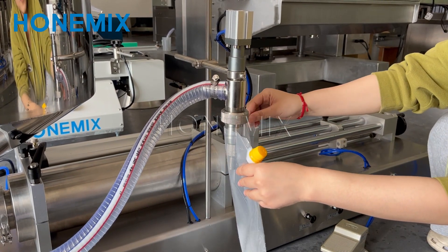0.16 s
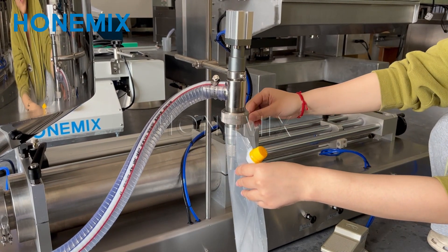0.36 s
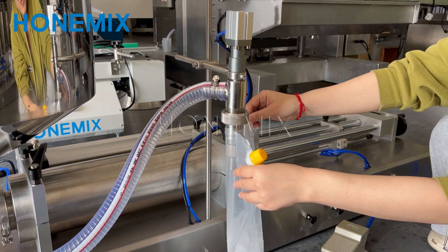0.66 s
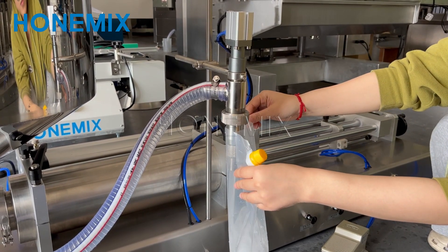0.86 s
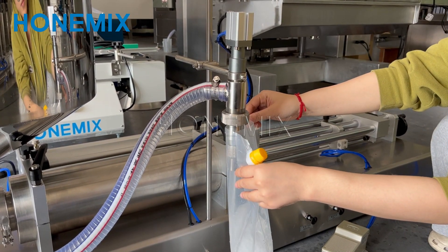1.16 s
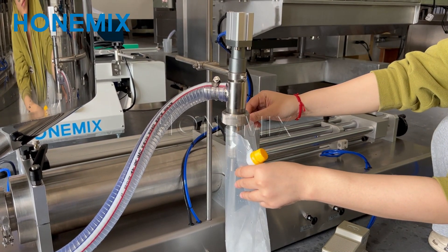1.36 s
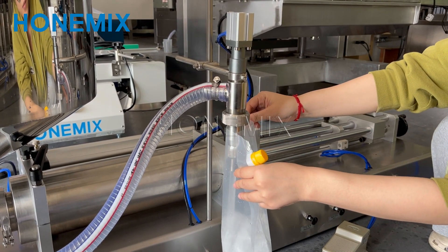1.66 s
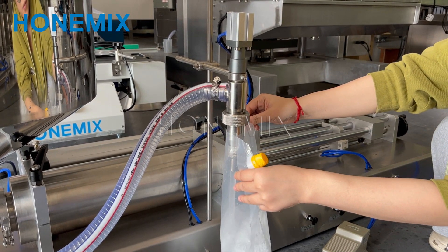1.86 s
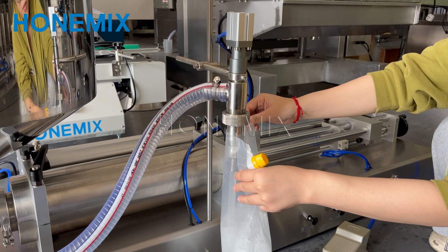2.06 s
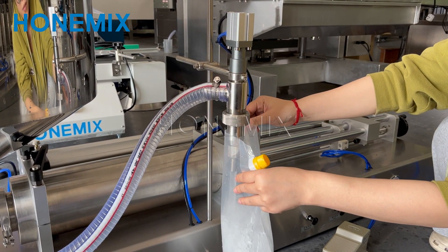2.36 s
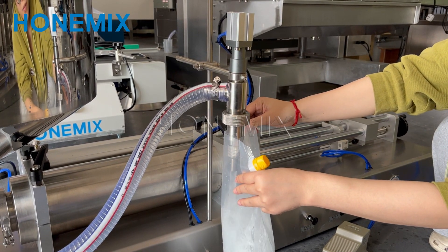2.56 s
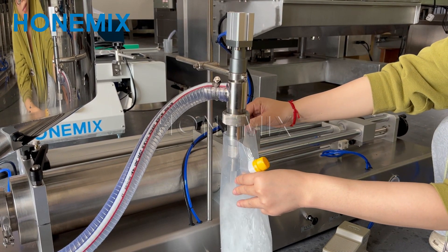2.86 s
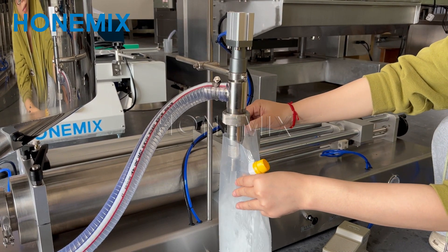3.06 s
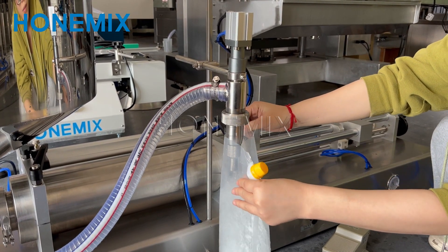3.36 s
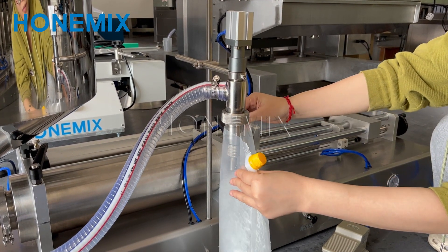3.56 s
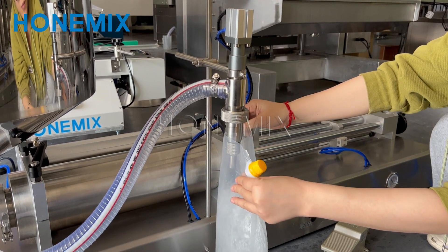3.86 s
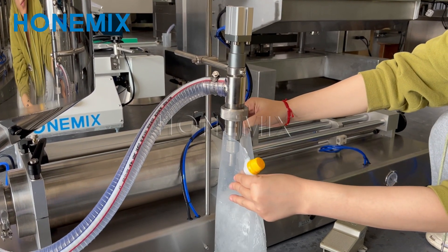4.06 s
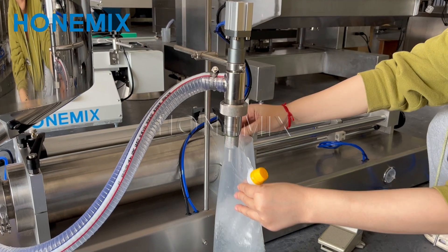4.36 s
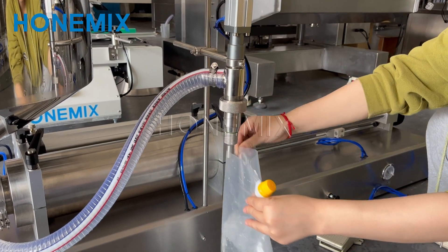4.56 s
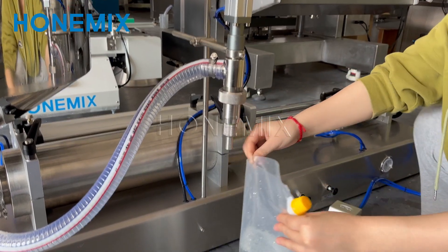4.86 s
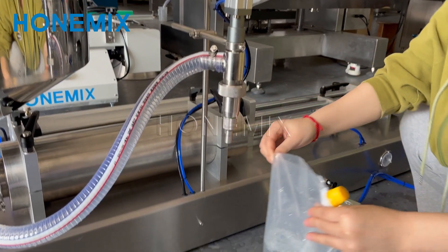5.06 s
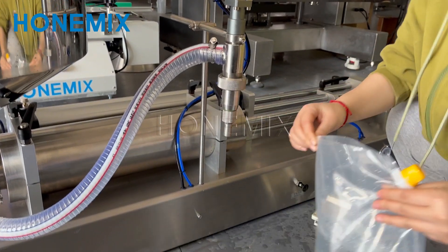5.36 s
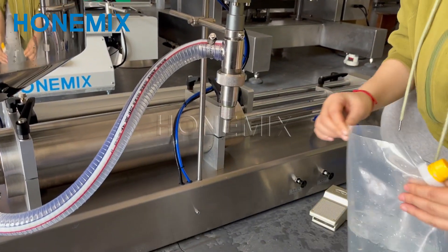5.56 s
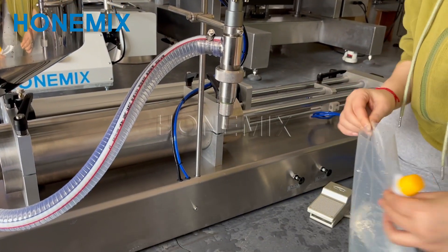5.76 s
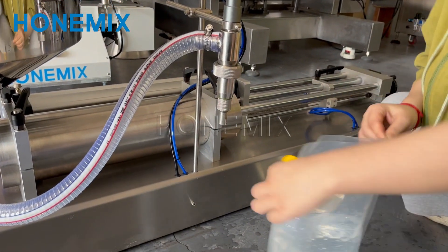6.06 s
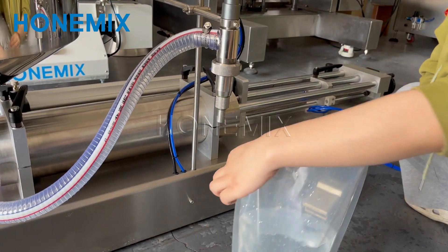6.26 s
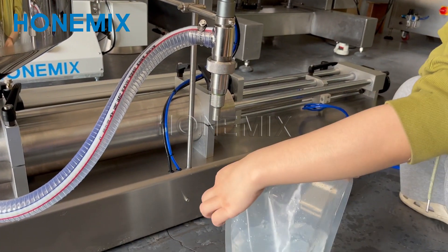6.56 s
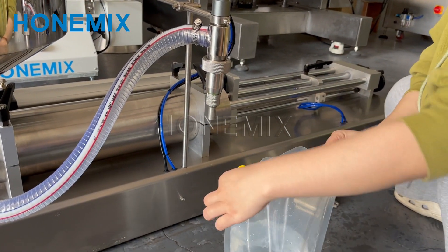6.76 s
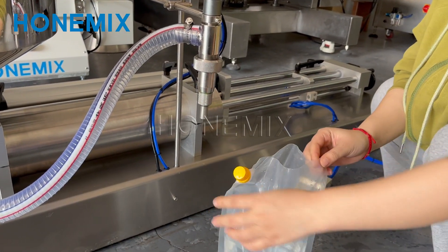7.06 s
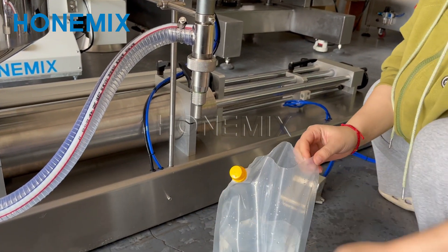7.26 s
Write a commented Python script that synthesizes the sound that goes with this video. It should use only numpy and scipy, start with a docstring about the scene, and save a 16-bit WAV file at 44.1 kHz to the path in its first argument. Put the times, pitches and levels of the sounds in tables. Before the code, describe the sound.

Liquid runs into a plastic pouch under a constant resonant hiss from throttled air. After about three seconds the valve bangs, rattles and vents a strong rush of air with a faint groan inside; it fades and a softer double knock follows. The rest is quiet: ventilation rumble, brief film snaps, thin seal whistle, one clear plastic tap and a weaker one, then more crackling. Near microphone, modest workshop reverberation.

```python
"""Air hisses steadily while liquid runs into a plastic pouch; a valve slams, an air blast follows and dies away, with a
second, lighter slam. Then the pouch crackles, a seal whistles faintly and a spout taps, all over a workshop hum.
Air jets are noise shaped by pipe resonances; slams, taps and snaps are struck modes; bubbles are decaying sines.
The hum is narrow noise bands. Two microphone ports with differing phase and level give the stereo image."""
import sys
import numpy as np
from scipy import signal
from scipy.fft import rfft, irfft
from scipy.io import wavfile

SR = 44100
rng = np.random.default_rng(int(sys.argv[2]) if len(sys.argv) > 2 else 0)


def waveform_to_disk(signal):
    """Save audio, clipped to [-1, 1], as 16-bit WAV at the path in sys.argv[1]."""
    frames = np.transpose(np.atleast_2d(signal))
    scaled = np.clip(frames, -1, 1) * 32767
    samples = np.round(scaled).astype(np.int16)
    wavfile.write(sys.argv[1], SR, samples)


N = 326472
TIME = np.arange(N) / SR  # s
FREQ = np.fft.rfftfreq(N, 1 / SR) + 1e-3  # Hz, offset to avoid division by zero

# Throttled exhaust spectrum. Each row: frequency in Hz, relative density in dB per Hz.
FILL_COLOUR = [(700, -0.5), (1200, 1.2), (1900, -0.9), (2900, 0), (3900, -0.5), (5100, 0), (6300, -1),
               (7500, -1.5), (9500, -4.5), (11200, -2.5), (13000, -6.5), (15000, -14)]
# Pipework resonances. Each row: frequency in Hz, height above the colour in dB before the contrast factor.
FILL_RINGS = [(1399, 3), (1600, 4), (1715, 11.5), (1830, 9.5), (1959, 9.5), (2024, 7.8), (2099, 10.1),
              (2260, 7.5), (2305, 7.5), (2465, 4.4), (2670, 7.7), (3057, 7.5), (3560, 4.5), (3645, 7.5),
              (3690, 9), (3811, 6.5), (3865, 8.4), (4134, 8.4), (4198, 11.5), (4295, 4), (4730, 5),
              (4812, 5.2), (4875, 5), (5017, 10.5), (5103, 7.4), (5178, 8.5), (5297, 8.0), (5740, 8),
              (5964, 5), (6158, 6), (6287, 5.3), (6406, 5), (6503, 5), (6739, 8.1), (7170, 7), (7400, 6),
              (11220, 5), (13210, 5), (13430, 6), (13990, 11), (14080, 9), (14400, 5)]
# Resonance groups that swell and fade. Each row: frequency in Hz, width in Hz, depth in dB.
FILL_SWELLS = [(1770, 200, 1.8), (2150, 300, 1.8), (4190, 150, .9)]
# Liquid churn spectrum. Each row: frequency in Hz, relative density in dB per Hz.
POUR_COLOUR = [(60, -4.5), (100, -2), (200, -6), (350, -5), (520, -9), (900, -17.5), (2000, -35)]
# Large bubbles. Each row: start in seconds, initial pitch in Hz, level in dB.
GULPS = [(1.598, 367, -29), (1.65, 377, -24.5), (1.68, 340, -28), (1.949, 318, -26), (2.715, 322, -25),
         (2.749, 340, -29), (2.785, 264, -26.5), (2.87, 324, -29), (2.987, 281, -28)]
# Workshop rumble spectrum. Each row: frequency in Hz, relative density in dB per Hz.
RUMBLE_COLOUR = [(25, 3.5), (36, -32.5), (50, -2), (110, 0), (170, -5.5), (300, -12), (480, -21),
                 (800, -28), (1300, -32), (1800, -37.5), (2600, -40.5), (5000, -53.5), (11000, -57),
                 (15000, -69.5)]
# Motor and mains hum. Each row: frequency in Hz, width in Hz, rms level in dB before the common trim.
HUM_TONES = [(51.3, 7, -39.5), (73.9, 5, -43), (95.1, 4.7, -38), (168, 13, -45.5), (190.2, 2, -45.5),
             (288.6, 11, -50.5), (606, 2.2, -63), (717, 20, -67.5), (1763, 120, -64.5)]
# Open exhaust spectrum. Each row: frequency in Hz, relative density in dB per Hz.
BLAST_COLOUR = [(300, -23.5), (600, -9), (1100, -9.5), (1800, -2), (2600, -5), (3800, -1.5), (5200, 2),
                (7000, -2.5), (8800, 6), (10500, -2), (12500, -9.5), (15000, 0.5)]
# Exhaust port resonances. Each row: frequency in Hz, height above the colour in dB before the contrast factor.
BLAST_RINGS = [(570, 3), (820, 5), (1399, 3.5), (1560, 3), (1765, 8), (1850, 4), (2024, 10), (2616, 3.5),
               (2850, 4), (3075, 9.5), (3348, 7.5), (3445, 3.7), (3682, 12.5), (3811, 3.7), (4134, 9.5),
               (4263, 4), (4371, 3), (4750, 4), (4866, 7), (4952, 6), (5028, 6.5), (5146, 6.5), (5300, 3),
               (5420, 7), (5566, 2.5), (5800, 3), (6150, 5), (6240, 7.5), (6556, 7), (6782, 4), (7340, 7),
               (9250, 3), (9990, 4), (13750, 8), (14390, 5)]
# Bleeding air spectrum. Each row: frequency in Hz, relative density in dB per Hz.
BLEED_COLOUR = [(400, -11), (900, -8.5), (1500, 2), (1900, 1), (2500, -3.5), (4000, 1.5), (5500, -2.5),
                (7000, -7), (10000, -12), (15000, -17)]
# Valve jet spectrum. Each row: frequency in Hz, relative density in dB per Hz.
SPIT_COLOUR = [(2000, -4.5), (4500, -5), (8000, -3), (12000, -7), (15500, -4)]
# Valve jets at each switch. Each row: start in seconds, level at 9-15 kHz in dB.
SPITS = [(3.279, -20), (3.345, -25), (4.238, -32)]
# Frame modes. Each row: frequency in Hz, strength in dB, full t60 in seconds before the ring share.
FRAME_MODES = [(109, 2, 0.72), (146, 0.5, 0.51), (149, -7, 1), (212.6, 5.5, 0.22), (277, -2.5, 0.28),
               (366, -3.5, 0.37), (488, -6.5, 0.4), (570, 7.5, 0.3), (684, 3, 0.24), (740, -3.5, 0.23),
               (830, -14.5, 0.3), (1041, -8.5, 0.3)]
# Slams and rebounds. Each row: start in seconds, peak in dB, favoured pitch in Hz, share of the full ring time.
SLAMS = [(3.278, -18, 550, 0.11), (3.286, -4, 120, 0.051), (3.304, -8.5, 150, 0.071),
         (3.323, -21, 240, .15), (3.329, -13.5, 730, 0.18), (3.337, -11.5, 770, .24),
         (3.347, -11, 192, 0.21), (3.354, -22.5, 326, 0.13), (3.364, -13.5, 150, 0.059),
         (3.377, -11, 154, 0.061), (4.238, -27.5, 560, 0.16), (4.246, -14.5, 129, .11),
         (4.253, -18.5, 293, 0.24), (4.277, -26, 650, 0.13), (4.279, -15, 175, 0.12),
         (4.309, -25.5, 290, 0.4)]
# Shuddering frame resonances. Each row: frequency in Hz, width in Hz, relative level in dB.
BOOM_TONES = [(107, 66, -2), (147, 22, 3.5), (215, 44, -11.5), (296, 50, -10), (426, 87, -13.5),
              (720, 190, -17.5)]
# Shudders after each valve switch. Each row: start in seconds, level in dB, decay in dB per second.
SHUDDERS = [(3.33, -21, 54), (4.27, -29.5, 59)]
# Piston seal groan. Each row: frequency in Hz, width in Hz, level in dB before the stroke contour.
GROAN_TONES = [(141.4, 20, -39.5), (556, 15, -40.5), (833, 30, -46)]
# Groan contour. Each row: time in seconds, gain in dB.
GROAN_LEVEL = [(3.42, -10), (3.53, 0), (3.64, -1), (3.72, 3), (3.81, -6), (3.93, -16)]
# Snapping creases. Each row: start in seconds, peak in dB, favoured pitch in Hz.
SNAPS = [(4.703, -36, 1400), (4.714, -35, 1000), (4.8598, -31, 3400), (4.869, -28, 3200),
         (4.8705, -32, 1200), (6.39, -25, 2300), (6.394, -25, 1590), (6.4065, -28, 2300),
         (6.4175, -36, 2680), (6.4382, -33, 1970), (6.444, -37, 3040), (6.453, -40, 2700),
         (6.481, -29, 2290), (6.49, -28, 2500), (6.4951, -25.5, 1950), (6.501, -35, 2000),
         (6.612, -46, 3000), (6.906, -42.5, 8500), (6.988, -46.5, 5480), (7.084, -43, 2700),
         (7.219, -35.5, 4400), (7.236, -32.5, 3560), (7.348, -31, 2780), (7.358, -24, 2210)]
# Pouch modes. Each row: frequency in Hz, strength in dB, full t60 in seconds before the ring share.
POUCH_MODES = [(630, 9, 0.023), (960, 15, 0.0093), (1560, -13, 0.032), (1920, 10.5, 0.007),
               (2640, 17.5, 0.0021), (2760, 6, 0.0053), (3750, 8.5, 0.0061), (5300, 15, 0.0023),
               (7130, 11.5, 0.0065), (9500, 9, 0.012), (11400, 12, 0.0075)]
# Film sliding on film. Each row: start in seconds, end in seconds, rms level in dB, favoured pitch in Hz,
# spread in octaves, slips per second.
RUBS = [(4.678, 4.9, -49.5, 1430, 0.33, 9000), (6.384, 6.473, -45, 1450, 0.98, 2400),
        (6.474, 6.508, -50, 2000, 0.9, 3000), (7.345, 7.428, -43, 1820, 3.2, 6700)]
# Whistle strength. Each row: time in seconds, level in dB.
WHISTLE_LEVEL = [(5.375, -70), (5.41, -62), (5.51, -60), (5.6, -57.5), (5.68, -55.5), (5.79, -55.5),
                 (5.85, -61), (6.0, -67), (6.26, -70)]
# Whistle side tones. Each row: frequency in Hz, width in Hz, relative level in dB.
WHISTLE_TONES = [(2375, 42, -9.5), (2885, 28, -4), (2985, 28, -7), (3170, 160, -22), (3400, 130, -15.5),
                 (3830, 75, -14), (3980, 35, -17), (6010, 50, -22)]
# Spout taps. Each row: start in seconds, peak in dB, favoured pitch in Hz, spread in octaves.
TAPS = [(5.9634, -11.5, 1444, 3.8), (6.159, -23.5, 1050, 0.53)]
# Spout modes. Each row: frequency in Hz, strength in dB, full t60 in seconds before the ring share.
SPOUT_MODES = [(717, 4.5, 0.039), (957, -4.5, 0.055), (1033, 1, 0.034), (1375, 3, 0.022), (1790, 7, 0.028),
               (2060, 10, 0.0099), (2830, 0, 0.0067), (3210, 11, 0.0069), (3700, 0, 0.01),
               (4330, 3, 0.0064), (5400, 6, 0.0063), (7460, 4.5, 0.0068)]
# Port phase. Each row: frequency in Hz, lead of left over right in radians.
PORT_PHASE = [(20, 0), (950, .2), (1550, -.6), (1810, 0), (2580, .8), (5300, .25), (5600, -.7), (6500, -.9),
              (7840, -3), (8870, -3.3), (11100, -6), (13000, -6.5), (14600, -9), (15400, -9.4)]
# Port balance. Each row: frequency in Hz, left minus right in dB.
PORT_BALANCE = [(100, 0.3), (400, 1.7), (700, 1.5), (1300, 0), (2400, 1.3), (4400, 4), (8000, 0),
                (15000, 0)]
# Diffuse noise width. Each row: frequency in Hz, side minus mid in dB.
PORT_SPREAD = [(60, -24), (130, -18), (300, -10), (640, -5), (1400, -5.5), (3100, -7), (5500, -7),
               (8000, -16), (15000, -15)]

# Cycle: valve switches to return, piston arrives home, valve switches back.
RETURN_S, HOME_S, RESET_S = 3.277, 3.95, 4.24
# Exhaust levels refer to 3-7 kHz, valve air to 9-15 kHz; attacks are time constants.
FILL_DB, FILL_SAG_DB_PER_S, FILL_RELEASE_DB_PER_S, SWELL_RATE_HZ = -33, 0.25, 801.5, 4.1
POUR_DB, POUR_ATTACK_S, POUR_GROWTH_DB_PER_S, POUR_RELEASE_DB_PER_S = -37.5, 0.75, 0.08, 37.5
RUMBLE_DB, HUM_TRIM_DB = -34.5, 0.34
BLAST_DB, BLAST_ATTACK_S, BLAST_DROOP_DB, BLAST_RELEASE_DB_PER_S = -19, 0.031, 7, 281
BLEED_DB, BLEED_SAG_DB_PER_S, BLEED_HALF_S = -36.5, 12.5, 0.057  # gain first halves this long after reset
SPIT_ATTACK_S, SPIT_DECAY_DB_PER_S = 0.0039, 299.5
SEEP_DB, SEEP_DECAY_DB_PER_S = -66, 6
WHISTLE_HZ, WHISTLE_JITTER_SHARE, SIDE_TONES_DB = 2860, .003, 0
PEEP_START_S, PEEP_END_S, PEEP_HZ, PEEP_DB = 6.215, 6.325, 6890, -75
CHATTER_S, CHATTER_DB, CHATTER_HZ = 0.002004, -1.5, 2820  # delay and level relative to the tap
TOP_HZ = 15750


def amp(db):
    """Decibels to gain."""
    return 10 ** (np.asarray(db) / 20)


def over_pitch(rows):
    """(Hz, value) rows interpolated on a log-frequency axis."""
    hz, value = np.transpose(rows)
    return np.interp(np.log(FREQ), np.log(hz), value)


def bell(hz, width_hz):
    """Resonance curve, 1 at its centre."""
    return 1 / (1 + (2 * (FREQ - hz) / width_hz) ** 2)


def since(s):
    """Seconds since a moment; zero before it."""
    return np.maximum(TIME - s, 0)


def envelope(start_s, end_s, attack_s, release_db_per_s):
    """A flow builds up exponentially from its start and dies away after its end."""
    rise = 1 - np.exp(-since(start_s) / attack_s)
    return rise * amp(-release_db_per_s * since(end_s))


def wander(rate_hz):
    """Low-passed random motion with a spread of 1."""
    slow = irfft(rfft(rng.standard_normal(N)) * bell(0, 2 * rate_hz) ** 2, N)
    return slow / slow.std()


def flutter(rate_hz, depth_db):
    """Randomly wandering gain."""
    return amp(depth_db * wander(rate_hz))


def noise(colour, band_hz=(0, SR)):
    """Diffuse noise as (mid, side); mid has unit rms inside the band."""
    spectra = rfft(rng.standard_normal((2, N))) * colour
    inside = (FREQ > band_hz[0]) & (FREQ < band_hz[1])
    spectra *= N / np.sqrt(2 * np.sum(abs(spectra[0, inside]) ** 2))
    spectra[1] *= amp(over_pitch(PORT_SPREAD))
    return irfft(spectra, N)


def add(track, s, sound):
    """Mix a sound into a track at a time."""
    start = int(s * SR)
    part = sound[:max(N - start, 0)]
    track[start:start + len(part)] += part


def ring(modes, favoured_hz, octaves, ring_share, length_s, push_cycles=0):
    """Struck body: modes near the favoured pitch answer most; a soft push builds over some cycles. Peak 1."""
    t = TIME[:int(length_s * SR)]
    hz, db, t60 = np.transpose(modes)[:, :, None]
    distance = np.log2(hz / favoured_hz) / octaves
    weight = amp(db) / (1 + distance ** 2) ** 2.0
    hz = hz * (1 + .01 * rng.standard_normal(hz.shape))  # each strike detunes slightly
    decay = np.exp(-np.log(1000) * t / (t60 * ring_share))
    sound = np.sum(weight * np.sin(2 * np.pi * hz * t) * decay, axis=0)
    sound = sound * (1 - np.exp(-(t * favoured_hz / (push_cycles + 1e-9)) ** 2))
    return sound / abs(sound).max()


def crack(decay_s, top_hz):
    """Very short noise burst, dulled above top_hz."""
    t = TIME[:SR // 20]
    burst = signal.lfilter([.4], [1, -.5], rng.standard_normal(len(t)))
    dulled = signal.lfilter(*signal.butter(2, top_hz, fs=SR), burst)
    return dulled * np.exp(-t / decay_s)


def room(x, near_db, far_db, near_t60=0.073, far_t60=.5):
    """Quick reflections off the machine and a longer shop tail, as (mid, side); t60 in seconds."""
    out = np.array([x, 0 * x])
    t = TIME[:SR]
    for db, t60 in ((near_db, near_t60), (far_db, far_t60)):
        echo = rng.standard_normal((2, SR)) * np.exp(-np.log(1000) * t / t60) * (t > .002)
        echo = echo / np.linalg.norm(echo[0])
        out = out + amp(db) * signal.fftconvolve(x[None], echo, axes=1)[:, :N]
    return out


def exhaust(colour, rings, ring_width_hz, low_cut_hz, ring_contrast=1.204):
    """Turbulent jet coloured by pipe and housing resonances; a fixed random ripple roughens its spectrum."""
    # ring_width_hz holds at 3 kHz
    peaks = np.max([db * bell(hz, ring_width_hz * np.sqrt(hz / 3000)) for hz, db in rings], axis=0)
    grain = rng.standard_normal(N) * np.exp(-TIME / .012) * (TIME > .004)
    ripple_depth = np.interp(FREQ, [800, 2000, 5000, 8000], [.33, .25, .28, .42])
    ripple = abs(1 + ripple_depth * rfft(grain) / np.linalg.norm(grain))
    low_cut = 1 / np.sqrt(1 + (low_cut_hz / FREQ) ** 4)
    spectrum = ripple * amp(over_pitch(colour) + ring_contrast * peaks) * low_cut
    return noise(spectrum, band_hz=(3000, 7000))


def filling_hiss():
    """The creeping cylinder vents through the throttle; some resonances swell and fade independently."""
    flow = amp(FILL_DB - FILL_SAG_DB_PER_S * TIME - FILL_RELEASE_DB_PER_S * since(RETURN_S))
    jet = exhaust(FILL_COLOUR, FILL_RINGS, ring_width_hz=30, low_cut_hz=600)
    spectra = rfft(jet)
    swells = 0
    for hz, width_hz, depth_db in FILL_SWELLS:
        group = irfft(spectra * bell(hz, width_hz), N)
        swells = swells + group * (flutter(SWELL_RATE_HZ, depth_db) - 1)
    return (jet + swells) * flow * flutter(rate_hz=60, depth_db=0.55)


def bubble(hz, cycles, rise=0.16):
    """A bubble rings down while its pitch rises by a share."""
    u = np.arange(int(cycles * SR / hz)) * hz / SR / cycles  # 0 to 1 over its life
    tone = np.sin(2 * np.pi * cycles * (u + rise * u * u / 2))
    return tone * np.exp(-5 * u) * (1 - np.exp(-30 * u))


def liquid(bubble_db=-5, count=400):
    """The stream churns louder as the pouch fills and drags small bubbles under, with some large ones."""
    small, large = np.zeros(N), np.zeros(N)
    for when, size, strength in rng.random((count, 3)):
        level = amp(11 * (strength - size))
        add(small, when * HOME_S, level * bubble(260 * 4 ** size, cycles=19))
    for s, hz, db in GULPS:
        add(large, s, amp(db) * bubble(hz, cycles=29))
    growth = amp(POUR_DB + POUR_GROWTH_DB_PER_S * TIME)
    flow = growth * envelope(0, RETURN_S, POUR_ATTACK_S, POUR_RELEASE_DB_PER_S)
    churn = noise(amp(over_pitch(POUR_COLOUR))) * flutter(rate_hz=10.0, depth_db=1.5)
    bubbles = amp(bubble_db) * small * flow + large
    return churn * flow + room(bubbles, near_db=-22.5, far_db=-19.5)


def workshop():
    """Ventilation rumble and the wavering hum of other machines, as narrow noise bands."""
    rumble = noise(amp(over_pitch(RUMBLE_COLOUR))) * amp(RUMBLE_DB) * flutter(rate_hz=6.6, depth_db=1.4)
    hum = sum(amp(db) * noise(bell(hz, 2 * width_hz) ** 2) for hz, width_hz, db in HUM_TONES)
    return rumble + amp(HUM_TRIM_DB) * hum


def return_blast():
    """The cylinder returns with the exhaust wide open, losing pressure; at home the rest bleeds off softly."""
    jet = exhaust(BLAST_COLOUR, BLAST_RINGS, ring_width_hz=56, low_cut_hz=110)
    bleed = exhaust(BLEED_COLOUR, BLAST_RINGS, ring_width_hz=56, low_cut_hz=110, ring_contrast=.6)
    stroke = np.minimum(since(RETURN_S) / (HOME_S - RETURN_S), 1)
    jet_flow = amp(BLAST_DB - BLAST_DROOP_DB * stroke ** 2)
    jet_flow = jet_flow * envelope(RETURN_S, HOME_S, BLAST_ATTACK_S, BLAST_RELEASE_DB_PER_S)
    resting_s = np.minimum(since(HOME_S), RESET_S - HOME_S)
    bleed_flow = (TIME > HOME_S) * amp(BLEED_DB - BLEED_SAG_DB_PER_S * resting_s)
    bleed_flow = bleed_flow / (1 + since(RESET_S) / BLEED_HALF_S)
    return (jet * jet_flow + bleed * bleed_flow) * flutter(rate_hz=5.5, depth_db=1.64)


def valve_air():
    """The valve spits thin jets at each switch and seeps after the reset while its pressure runs down."""
    jet = noise(amp(over_pitch(SPIT_COLOUR)), band_hz=(9000, 15000))
    spits = sum(amp(db) * envelope(s, s + SPIT_ATTACK_S, SPIT_ATTACK_S, SPIT_DECAY_DB_PER_S)
                for s, db in SPITS)
    seep = amp(SEEP_DB) * envelope(RESET_S, RESET_S, SPIT_ATTACK_S, SEEP_DECAY_DB_PER_S)
    return jet * (spits + seep)


def frame_knocks():
    """Blows land and rebound at both valve switches, each at its own pitch; the frame booms and shudders."""
    track = np.zeros(N)
    for s, db, hz, ring_share in SLAMS:
        blow = ring(FRAME_MODES, hz, octaves=0.42, ring_share=ring_share, length_s=0.4, push_cycles=0.8)
        add(track, s, amp(db) * blow)
    boom = noise(sum(amp(db) * bell(hz, width_hz) for hz, width_hz, db in BOOM_TONES))
    shaking = sum(amp(db) * envelope(s, s, attack_s=0.016, release_db_per_s=decay)
                  for s, db, decay in SHUDDERS)
    return room(track, near_db=-21, far_db=-18.0) + boom * shaking


def piston_groan():
    """The piston seal judders along the barrel: broken tones that swell in mid-stroke and fade before its end."""
    running = amp(np.interp(TIME, *np.transpose(GROAN_LEVEL)))
    running = running * envelope(RETURN_S, HOME_S, attack_s=0.03, release_db_per_s=296)
    tones = 0
    for hz, width_hz, db in GROAN_TONES:
        tone = noise(bell(hz, 2 * width_hz) ** 2)
        tones = tones + amp(db) * tone * flutter(rate_hz=14, depth_db=1.5)
    return running * tones


def pouch(crack_db=-8):
    """Creases snap with a short crack; sliding film rustles as countless tiny slips of uneven size."""
    track = np.zeros(N)
    for s, db, hz in SNAPS:
        snap = ring(POUCH_MODES, hz, octaves=1.15, ring_share=0.69, length_s=.1, push_cycles=1.0)
        add(track, s, amp(db) * snap)
        brightness = min(hz / 4000, 1) ** 2  # low snaps crack less
        add(track, s, amp(db + crack_db) * brightness * crack(decay_s=0.0051, top_hz=14000))
    sizes = rng.standard_normal(N) * rng.exponential(size=N) * flutter(rate_hz=90, depth_db=2)
    chance = rng.random(N)
    for start_s, end_s, db, hz, octaves, slips_per_s in RUBS:
        slips = sizes * (chance < slips_per_s / SR)
        stretch = slips[int(start_s * SR):int(end_s * SR)]
        film = ring(POUCH_MODES, hz, octaves, ring_share=0.19, length_s=0.019)
        rustle = signal.fftconvolve(stretch * signal.windows.tukey(len(stretch), .1), film)
        add(track, start_s, amp(db) * rustle / rustle.std())
    return room(track, near_db=-6.0, far_db=-13.5, near_t60=0.013, far_t60=0.73)


def seal_whistle():
    """The last air whistles through a seal: an unsteady tone, side tones that follow it, and a late high peep."""
    turns = np.cumsum(1 + WHISTLE_JITTER_SHARE * wander(rate_hz=54)) / SR
    start_s, end_s = WHISTLE_LEVEL[0][0], WHISTLE_LEVEL[-1][0]
    strength = amp(np.interp(TIME, *np.transpose(WHISTLE_LEVEL)))
    strength = strength * envelope(start_s, end_s, attack_s=.01, release_db_per_s=99)
    tone = np.sin(2 * np.pi * WHISTLE_HZ * turns) * strength
    peep = np.sin(2 * np.pi * PEEP_HZ * TIME) * amp(PEEP_DB)
    peep = peep * envelope(PEEP_START_S, PEEP_END_S, attack_s=.012, release_db_per_s=400)
    side_tones = noise(sum(amp(db) * bell(hz, width_hz) for hz, width_hz, db in WHISTLE_TONES))
    clear = (tone + peep) * flutter(rate_hz=50, depth_db=2.2)
    return room(clear, near_db=-7, far_db=-14) + amp(SIDE_TONES_DB) * side_tones * strength


def spout_taps(crack_db=-19):
    """The stiff spout is knocked twice as the pouch is turned over; each chatters once, only the first cracks."""
    track = np.zeros(N)
    for s, db, hz, octaves in TAPS:
        tap = ring(SPOUT_MODES, hz, octaves, ring_share=0.98, length_s=.1, push_cycles=1.0)
        chatter = ring(SPOUT_MODES, CHATTER_HZ, octaves=0.98, ring_share=0.76, length_s=.1, push_cycles=0.84)
        add(track, s, amp(db) * tap)
        add(track, s + CHATTER_S, amp(db + CHATTER_DB) * chatter)
    first_s, first_db = TAPS[0][:2]
    add(track, first_s, amp(first_db + crack_db) * crack(decay_s=0.017, top_hz=9100))
    return room(track, near_db=-14, far_db=-18, near_t60=.06, far_t60=.35)


def scene():
    """All sources reach two microphone ports that differ in phase and level over frequency."""
    air = filling_hiss() + return_blast() + valve_air() + seal_whistle()
    machine = liquid() + piston_groan() + frame_knocks()
    mid, side = rfft(air + machine + spout_taps() + pouch() + workshop())
    port = amp(over_pitch(PORT_BALANCE) / 2) * np.exp(.5j * over_pitch(PORT_PHASE))
    return irfft(np.array([(mid + side) * port, (mid - side) / port]), N)


def record(dry):
    """The recorder cuts the deepest rumble, rounds the highest peaks and cuts the top."""
    dry = irfft(rfft(dry) / np.sqrt(1 + (35 / FREQ) ** 8), N)  # 35 Hz low cut
    dry = dry / (1 + (dry / .92) ** 8) ** (1 / 8)
    top_cut = signal.ellip(10, .2, 80, TOP_HZ, fs=SR, output="sos")
    return signal.sosfilt(top_cut, dry)


dry = scene()
out = record(dry)
waveform_to_disk(out)
```